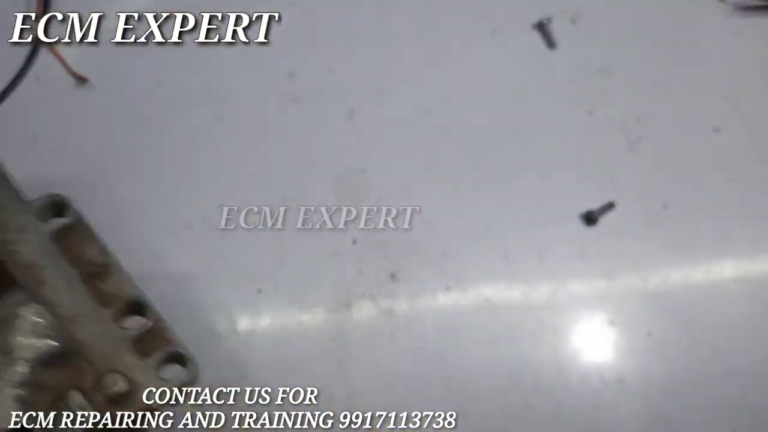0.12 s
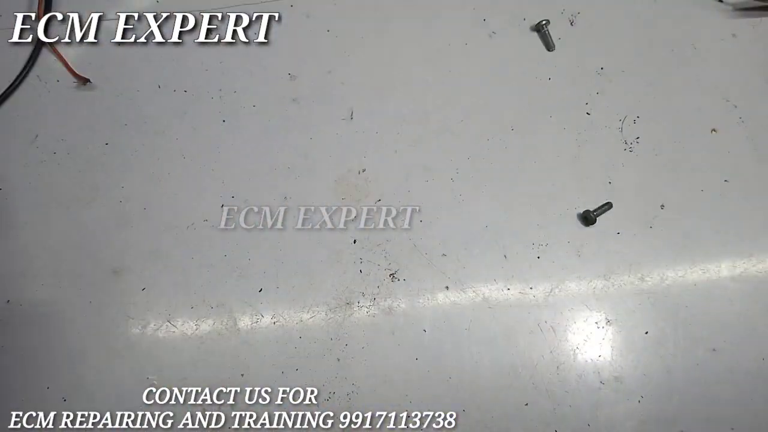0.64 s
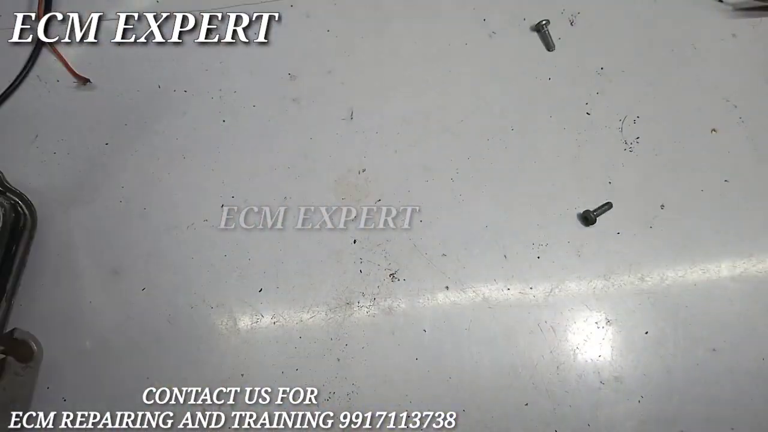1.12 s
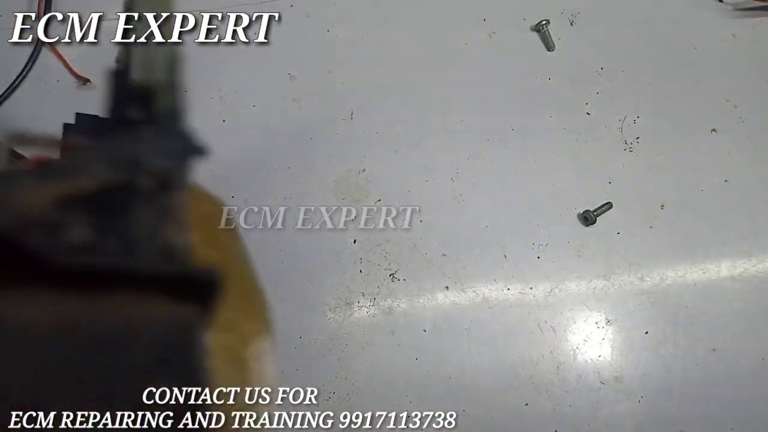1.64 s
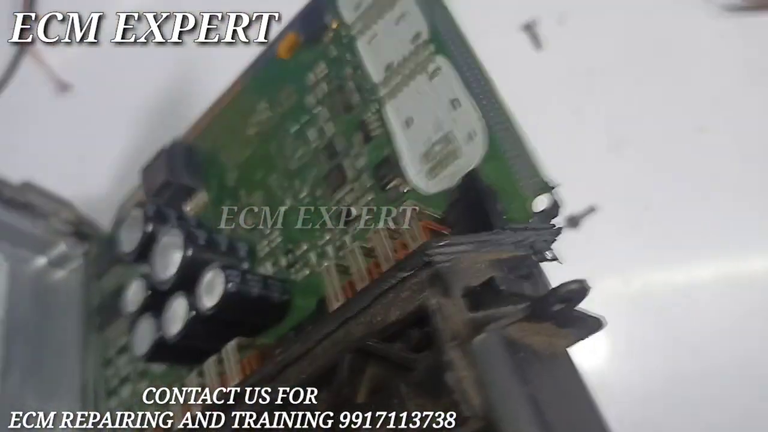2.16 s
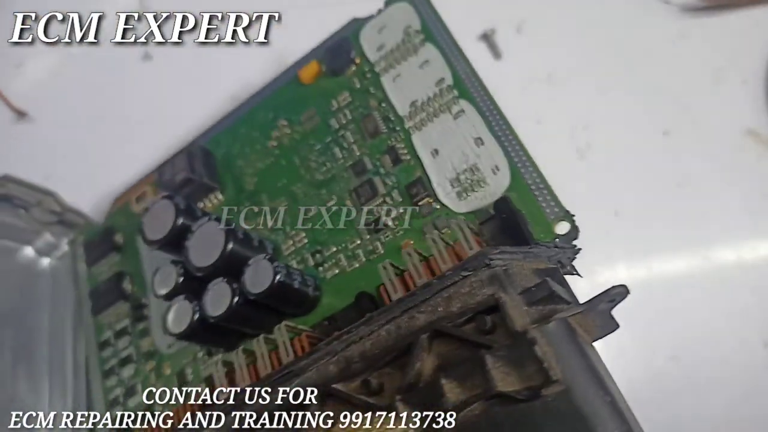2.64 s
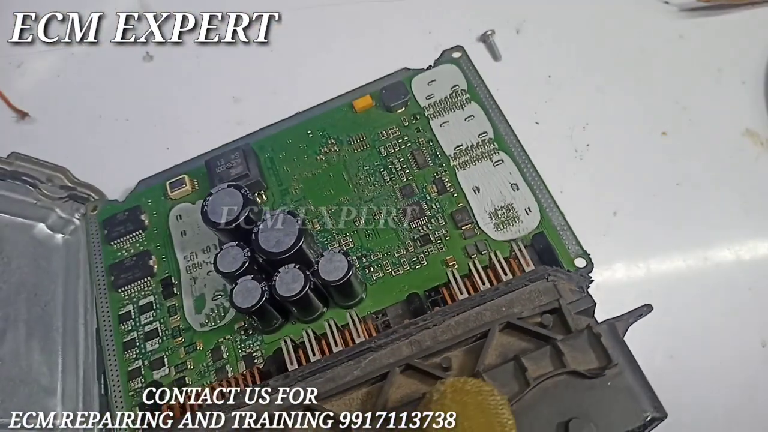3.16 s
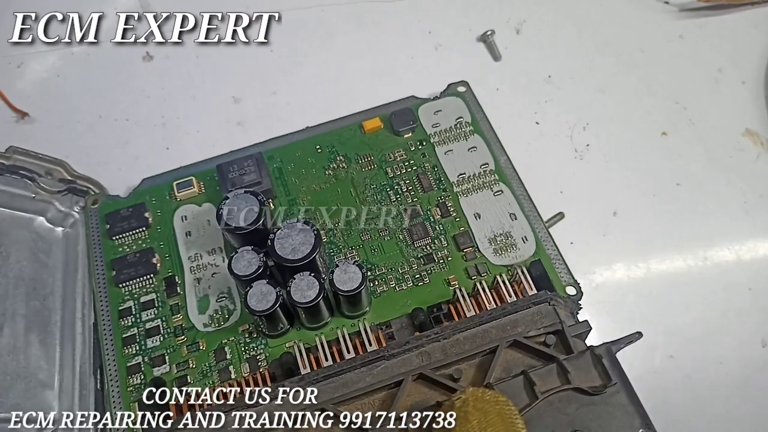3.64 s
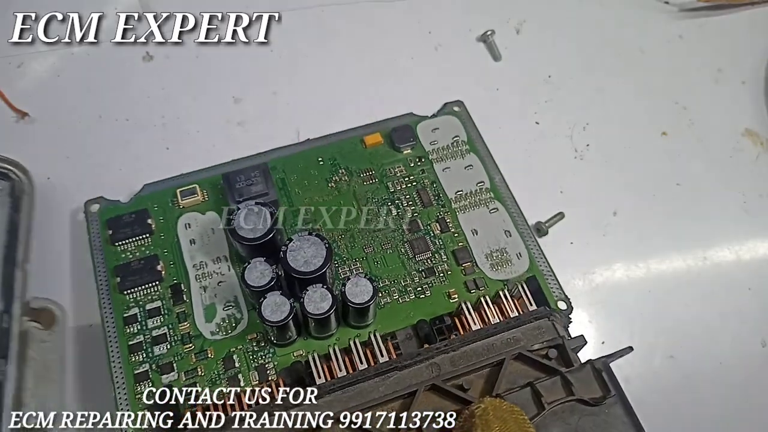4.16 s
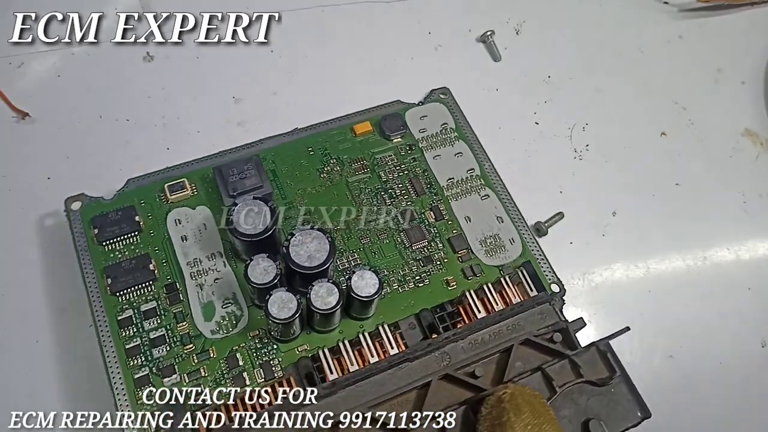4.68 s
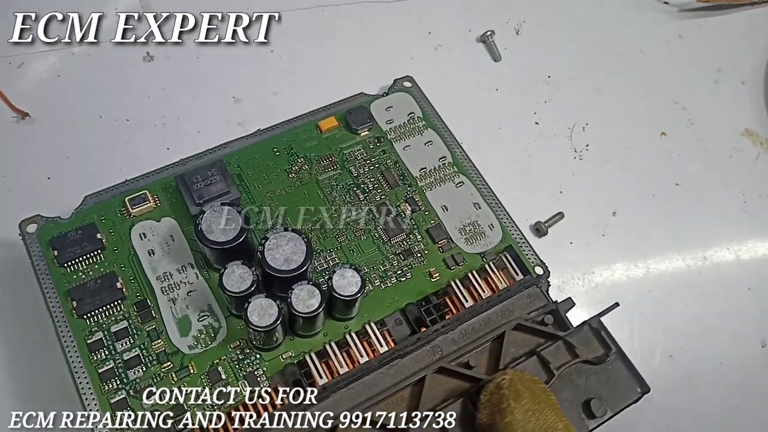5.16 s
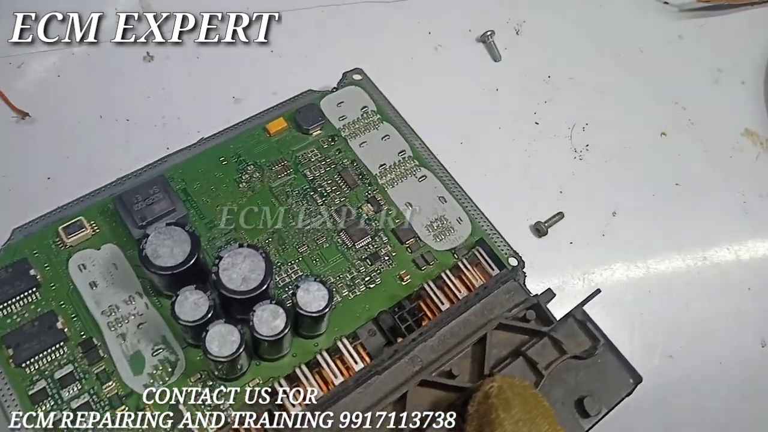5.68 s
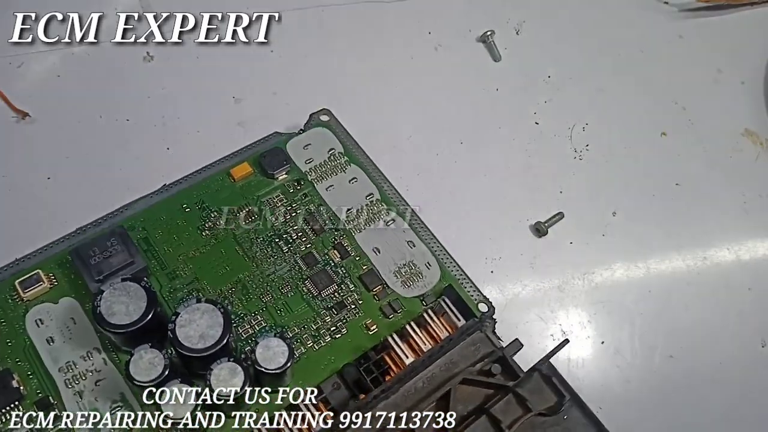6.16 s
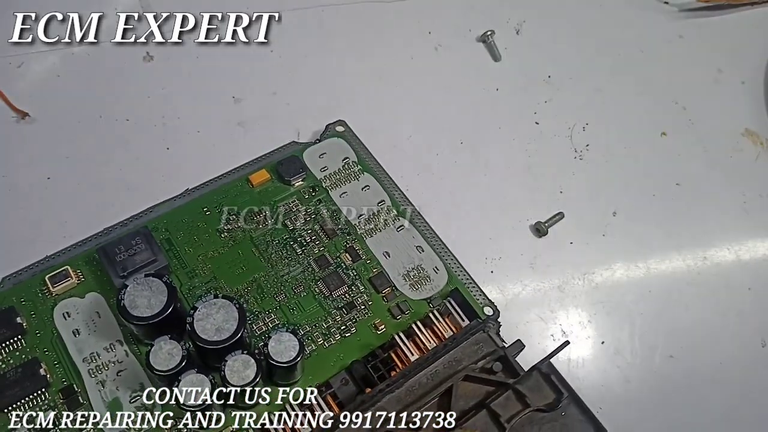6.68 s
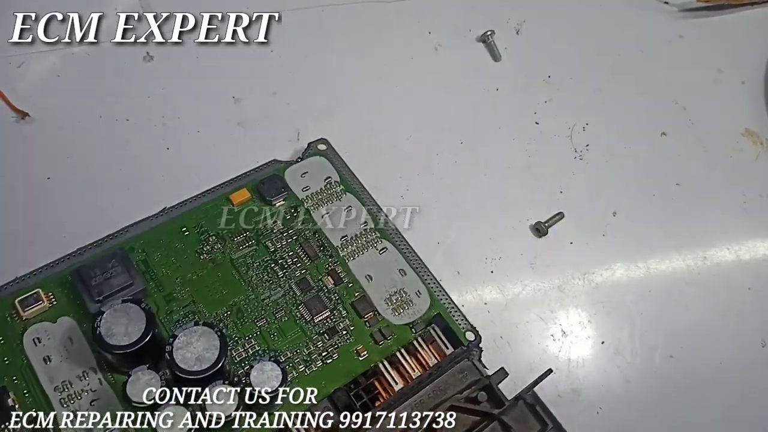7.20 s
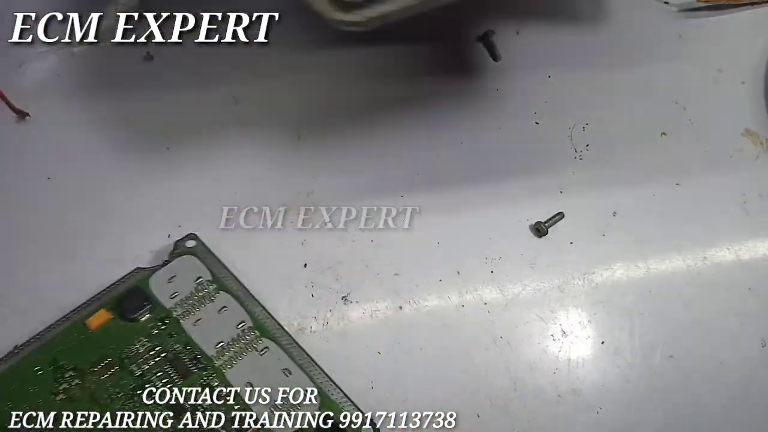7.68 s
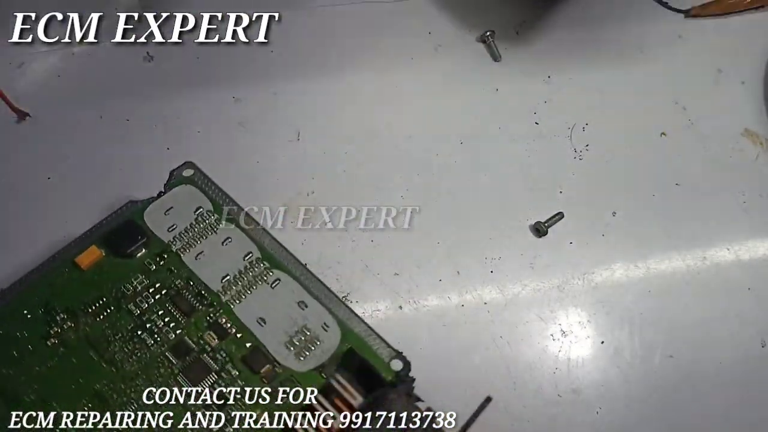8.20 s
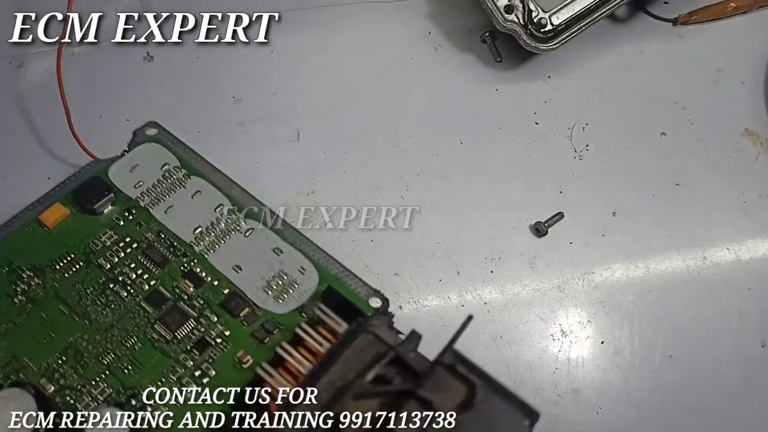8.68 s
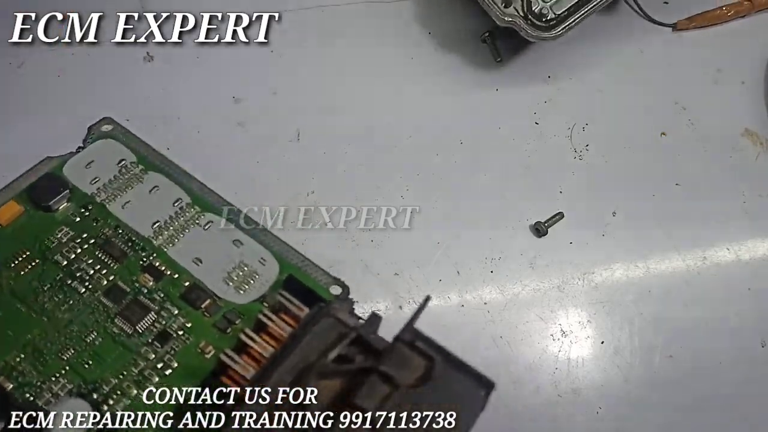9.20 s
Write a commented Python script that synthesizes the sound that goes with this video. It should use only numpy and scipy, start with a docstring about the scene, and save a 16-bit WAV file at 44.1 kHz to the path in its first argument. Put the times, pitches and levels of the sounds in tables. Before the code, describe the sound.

In a small workshop, close to a hard bench, a faint low fan hum runs throughout. After quiet touches comes a soft boomy thud, then a cluster of sharp ticks and gritty scuffs. A housing taps and rocks on the bench, once clearly. Later a rough scrape leads to hard metal knocks from a cast cover, the last pair loudest, with booming bench and small rattles dying off in a short room echo.

```python
"""Metal cover on a workbench

Small workshop, microphone near a hard bench: a cast metal cover and an electronic unit are handled on it.
Cover, housing and small parts are struck by short chatters of contacts that crack and ring split modes.
Parts slide as uneven grit, the bench top booms in its low modes, and one drag sets the cover singing.
These share a short diffuse room; behind them a fan hums in wavering sines over shaped room noise."""
import sys
import numpy as np
from scipy import signal
from scipy.fft import rfft, irfft
from scipy.io import wavfile

SR = 44100
rng = np.random.default_rng(int(sys.argv[2]) if len(sys.argv) > 2 else 0)


def wav_out(sig):
    """Save sig, one row per channel (or a flat mono array), as 16-bit PCM at SR to the path in sys.argv[1]."""
    wavfile.write(sys.argv[1], SR, np.round(np.clip(np.atleast_2d(sig).T, -1, 1) * 32767).astype(np.int16))


def nominal_scale(level):
    """Amplitude ratio for a level in decibels (scalar or array-like)."""
    x = np.asarray(level, float) / 20
    return 10 ** x


N = 411453   # samples, about 9.33 s


def rms_one(x):
    """Scaled to rms 1."""
    return x / np.sqrt(np.mean(x ** 2) + 1e-20)


def at_hz(points, hz):
    """Reads a table of (Hz, value) on a log-frequency axis."""
    table_hz, values = np.transpose(points)
    return np.interp(np.log(hz), np.log(table_hz), values)


def cut(x, hz, kind, order=2):
    """Butterworth low-, high- or band-pass."""
    return signal.sosfilt(signal.butter(order, hz, kind, fs=SR, output="sos"), x + 1e-18)


def drift(rate):
    """Slow chance: normal draws of spread 1, `rate` per second, joined by straight lines."""
    knots = rng.standard_normal(N // 200)
    return np.interp(np.arange(N) * rate / SR, np.arange(len(knots)), knots)


def coloured(x, points):
    """Noise shaped by a spectrum table; rms 1."""
    hz = np.maximum(np.fft.rfftfreq(N, 1 / SR), 1)
    return rms_one(irfft(rfft(x) * nominal_scale(at_hz(points, hz)), N))


def ring(drive, hz, t60):
    """A two-pole resonator: a unit click rings a sine of height 1 that falls 60 dB in t60 seconds."""
    radius = nominal_scale(-60 / (max(t60, .01) * SR))
    angle = 2 * np.pi * hz / SR
    return signal.lfilter([0, np.sin(angle)], [1, -2 * radius * np.cos(angle), radius * radius], drive + 1e-18)


def split_modes(modes, split):
    """An uneven casting splits each mode into four close neighbours that beat."""
    modes = np.repeat(modes, 4, axis=0)
    offsets = np.resize([-1.5, -.5, .5, 1.5], len(modes)) + rng.uniform(-.4, .4, len(modes))
    modes[:, 0] *= 1 + split * offsets
    return modes


def chatter_of(shape):
    """Sharp contacts under an envelope: scattered in time, flat in spectrum."""
    contacts = rng.standard_normal(len(shape))
    for _ in range(4):
        spread = rfft(contacts * shape)
        contacts = irfft(spread / np.abs(spread))   # flatten the spectrum
        early_spread = np.std(contacts[:len(shape) // 64])
        contacts = np.tanh(contacts / (shape + .05) / early_spread)   # even out the heights
    return contacts * shape


def blows(events, modes, ring_db, crack_db, rise, mids_db, mids_follow, contact_ms):
    """Each blow is a short chatter of contacts: heard as a crack in four bands, and feeding the modes."""
    age = np.arange(4096) / SR
    edges, centres = [450, 1050, 2000, 6500, 16000], [750, 1500, 3500, 11000]   # crack bands, Hz
    length = contact_ms / 1000
    envelope = np.tanh(age / (rise * length)) * np.exp(-(age / length) ** 1.2)
    crack = np.zeros((4, N + len(age)))
    drive = np.zeros((len(modes), N + len(age)))
    for s, level_db, body_db, edge_db, *free_db in events:
        chatter = chatter_of(envelope)
        colour = level_db + np.array([body_db, mids_db + mids_follow * body_db, 0, edge_db])
        here = slice(round(s * SR), round(s * SR) + len(age))
        crack[:, here] += nominal_scale(colour[:, None] + np.c_[crack_db]) * chatter

        strength = np.interp(np.log(modes[:, 0]), np.log(centres), colour)
        strength += modes[:, 1] + ring_db + sum(free_db)
        # each blow lands on another spot, so every group of neighbours gets its own chance level
        strength += 2.5 * np.repeat(rng.standard_normal(len(modes) // 4), 4)
        drive[:, here] += nominal_scale(strength)[:, None] * chatter / np.linalg.norm(chatter)

    rings = sum(ring(d[:N], hz, t60) for d, (hz, db, t60) in zip(drive, modes))
    bands = zip(edges, edges[1:])
    cracks = sum(cut(c[:N], band, "band", order=3) for c, band in zip(crack, bands))
    return cut(rings + cracks, 440, "high")


# Colour of the room noise. Each row: frequency in Hz, relative density in dB per Hz.
AIR_COLOUR = [(15, -69), (25, -29), (55, -4), (104, -1.5), (152, -10), (260, -11), (482, -16.5),
              (1050, -27.5), (2200, -33), (2700, -28.5), (7000, -34.5), (8300, -40.5), (9300, -39.5),
              (11000, -47.5), (13800, -42.5), (15500, -42)]
# Room noise over time. Each row: time in seconds, level in dB rms between 250 and 900 Hz, before the sway.
AIR_LEVEL = [(0.0, -52.5), (0.54, -57), (1.27, -58), (2.96, -53.5), (3.19, -55.5), (8.03, -56), (8.68, -51),
             (9.33, -53.5)]
# Hum lines of the fan. Each row: mean frequency in Hz, level in dB rms before the waver.
HUM_LINES = [(70.0, -62.5), (91.5, -65.5), (183.0, -53.5), (242.2, -66), (301.5, -70)]


def fan_and_air():
    """Steady room noise with a slow sway, and hum lines wavering in level and pitch."""
    air = coloured(rng.standard_normal(N), AIR_COLOUR)
    air = air / np.std(cut(air, [250, 900], "band"))
    level_db = np.interp(np.arange(N) / SR, *np.transpose(AIR_LEVEL)) + .5 * drift(6.1)
    hum = np.zeros(N)
    for hz, db in HUM_LINES:
        level = nominal_scale(db + 1.5 * drift(3.7)) * np.sqrt(2)
        wavering_hz = hz + 1.16 * drift(5.0)
        hum += level * np.sin(np.cumsum(2 * np.pi * wavering_hz / SR))
    return nominal_scale(level_db) * air + hum


# How long the workshop rings. Each row: frequency in Hz, time to fall 60 dB in seconds.
ROOM_T60 = [(200, 0.37), (1500, 0.45), (6000, 0.38), (14000, 0.34)]


def room(x, first_s):
    """A diffuse tail: octave bands of noise, each dying at its own rate, fading in over first_s."""
    t = np.arange(SR // 2) / SR
    tail = np.zeros(len(t))
    for low in 125 * 2. ** np.arange(7):
        band = cut(rng.standard_normal(len(t)), [low, 2 * low], "band")
        tail += band * nominal_scale(-60 * t / at_hz(ROOM_T60, low * np.sqrt(2)))
    tail *= np.clip(t / first_s, 0, 1)
    return signal.fftconvolve(x, tail / np.linalg.norm(tail))[:N]


# Weight landing on the bench top. Each row: start in seconds, relative level in dB,
# hardness in dB per octave, nearness to the edge in dB (favours the lowest mode).
THUMPS = [(0.167, -64.5, 23, 0), (0.606, -63, 19, 0), (1.716, -26, -13, -10), (2.274, -35.5, 0, 3),
          (2.301, -42, 8, -6), (2.526, -51, 9, -6), (2.76, -54.5, 8.5, -4), (2.86, -55, 8, -4),
          (2.941, -46.5, 7, -6), (4.113, -43.5, 6.5, -8), (6.253, -45.5, 12.5, -4), (7.026, -51, 16, -4),
          (8.197, -43, 17.5, 3), (8.455, -28, 3.5, 9.5), (8.49, -28.5, 4, 12.5), (8.579, -25.5, -11, -13),
          (8.68, -35, -1.5, -20), (8.829, -34.5, -19, -1), (8.93, -36, -0.5, -11)]
# Modes of the bench top. Each row: frequency in Hz, relative level in dB, t60 in seconds.
BENCH_MODES = [(88, 2.5, 0.3), (118, 2.5, 0.57), (228, -3.5, 0.21), (318.5, -7, 0.12), (433, -3.5, 0.034),
               (507, -3, 0.035)]


def bench():
    """Soft pushes on the bench top; its low modes boom, harder landings reach the higher ones."""
    boom = np.zeros(N)
    at = [round(row[0] * SR) for row in THUMPS]
    _, push_db, hardness, edge_db = np.transpose(THUMPS)
    second_hz = BENCH_MODES[1][0]
    for k, (hz, db, t60) in enumerate(BENCH_MODES):
        octaves = np.log2(min(hz, 380) / second_hz)   # hardness tilts no further than 380 Hz
        pushes = np.zeros(N)
        pushes[at] = nominal_scale(push_db + db + hardness * octaves + edge_db * (k == 0))
        boom += ring(pushes, hz, t60)
    return cut(cut(boom, 710, "low"), 110, "high", order=4)


# One surface sliding on another. Each row: start in seconds, length in seconds,
# relative level in dB, level of the bright part against the dull part in dB.
SLIDES = [(0.036, 0.026, -60, -1.5), (0.14, 0.28, -66, -.5), (0.557, 0.17, -64, -1), (0.794, 0.033, -68, 6),
          (2.183, 0.12, -65.5, 1), (2.274, 0.059, -51, -7), (2.41, 0.0086, -79, 2), (2.72, 0.21, -89, -20),
          (4.105, 0.074, -61.5, -7), (4.223, 0.014, -70.5, 12), (5.362, 0.015, -56, 6.5),
          (5.52, 0.029, -60.5, 2.5), (5.922, 0.023, -63, 2.5), (6.186, 0.036, -44, -8),
          (6.356, 0.059, -59, -2), (6.515, 0.087, -54.5, -7), (6.78, 0.15, -59, -7),
          (8.11, 0.054, -59.5, -9), (8.497, 0.13, -53.5, -6), (8.86, 0.042, -43.5, -9),
          (8.993, 0.023, -74, 12)]
# Colour of the dull part. Each row: frequency in Hz, relative density in dB per Hz.
SLIDE_COLOUR = [(290, -33), (500, -39), (792, -4), (938, -7), (2690, -14.5), (4100, -7), (9000, -15.5),
                (11700, -86), (19800, -120)]


def sliding():
    """Dense grit under the moving surface: uneven grains, dull part and bright part."""
    swell, fade = 510, 300   # dB per second: a stroke comes up fast and dies away slower
    grain_db = 3.5 * np.minimum(rng.exponential(1, N), 5)
    grit = rng.standard_normal((2, N)) * nominal_scale(grain_db)
    t, level, bright = np.arange(N) / SR, np.zeros(N), np.zeros(N)
    for s, length, db, highs_db in SLIDES:
        before, after = np.maximum(s - t, 0), np.maximum(t - s - length, 0)
        stroke = nominal_scale(db - swell * before - fade * after)
        level += stroke
        bright += nominal_scale(highs_db) * stroke
    slips = nominal_scale(5.2 * drift(120))
    dull_grit = coloured(grit[0], SLIDE_COLOUR)
    bright_grit = rms_one(cut(grit[1], 7700, "high"))
    return slips * (level * dull_grit + bright * bright_grit)


# How long each kind of contact chatters: decay time in ms, by kind.
CONTACT_MS = {"knock": 6.1, "tap": 7.68, "tick": 1.47, "scuff": 11}
# In the four blow tables below, body is the lows and edge the highs, both against the upper mids.
# Short scuffs of an edge along the bench. Each row: start in seconds, relative level, body and edge in dB.
SCUFFS = [(2.289, -31, -18, -12), (2.582, -31.5, -42, -10), (4.163, -32.5, -10, -21),
          (6.174, -26.5, -52, -21), (6.207, -19.5, -20, -15.5), (6.354, -29, -20, -13.5)]


def scuffs(unit_modes):
    """Slow-rising, long chatters: nearly all crack, with the unit's modes only faintly stirred."""
    return blows(SCUFFS, unit_modes, ring_db=-51, crack_db=[21.0, 30.4, 1.2, 9.7], rise=0.95,
                 mids_db=-28, mids_follow=0.23, contact_ms=CONTACT_MS["scuff"])


# Small parts and fingers on the unit. Each row: start in seconds, relative level, body and edge in dB.
TICKS = [(1.701, -42.5, -18, -4), (2.264, -20, -24, -9), (2.275, -30, -25, -3), (2.334, -38, -5, -15),
         (2.399, -37, 0, 4), (2.426, -23, -34, -15), (2.433, -31, -2, 7), (2.439, -27, -29, -17),
         (2.53, -35.5, 3, -26), (2.561, -36, -21, -9), (2.664, -74, -16, -3), (2.719, -44, -20, -11),
         (2.786, -44.5, 5, -33), (2.886, -52.5, -12, 9), (6.145, -42, -24, -10), (6.49, -45, -20, -2),
         (6.53, -35, -32, -4), (6.631, -35, -15, -19), (7.859, -40.5, -9, -7)]


def ticks(unit_modes):
    """Very short chatters on the unit, its small parts ringing high up."""
    return blows(TICKS, unit_modes, ring_db=-29.0, crack_db=[12.3, 13.4, 6.7, 7.7], rise=0.13,
                 mids_db=-4.5, mids_follow=0.32, contact_ms=CONTACT_MS["tick"])


# Housing set down and rocked on the bench. Each row: start in seconds, relative level, body, edge
# and ring in dB (how freely it rings after).
TAPS = [(0.166, -33.5, -8, -27, -6), (0.591, -40.5, -23, -36, -4), (0.791, -28.5, -12.5, -19, -5.5),
        (4.116, -40.5, 1.5, -51, -1.5), (4.216, -30.5, -15.5, -38, -2.5), (4.228, -34, -37, -22, 1),
        (4.797, -17, -10.5, -13, 0.5), (4.951, -32, 1, -10, -3), (4.958, -23, -2.5, -15, 2.5),
        (5.146, -28, -12.5, -30, 7), (5.204, -41.5, 2.5, -13, -2.5), (5.347, -48, 0, -38, 13.5),
        (5.359, -34, 11, -40, -4), (5.375, -28.5, -6, -33, -10), (5.94, -36.5, -5.5, -34, -1)]
# Modes of the housing. Each row: frequency in Hz before splitting, relative level in dB, t60 in seconds.
HOUSING_MODES = [(420, -10.5, 0.085), (785, -8, 0.12), (900, -4, 0.061), (970, -27, 0.069),
                 (1163, -3, 0.15), (1325, -9, 0.16), (1643, -8.5, 0.15), (1967, -16.5, 0.32),
                 (2400, -9, 0.1), (3015, -9, 0.09), (3390, -18.5, 0.12), (3900, -7, 0.086),
                 (4350, -19, 0.07), (5070, -6, 0.06), (5460, -29, .05), (6230, -38, .04)]


def housing():
    """Taps of the housing on the bench, each ringing its widely split modes."""
    return blows(TAPS, split_modes(HOUSING_MODES, split=0.02336), ring_db=-6.5,
                 crack_db=[4.5, 17.8, 1.05, 3.1], rise=0.13,
                 mids_db=-5.5, mids_follow=0.47, contact_ms=CONTACT_MS["tap"])


# Modes of the cast cover. Each row: frequency in Hz before splitting, relative level in dB, t60 in seconds.
COVER_MODES = [(411.4, -3.5, .12), (715, -16, 0.16), (780, 1, 0.052), (1310, -3, 0.059), (1545, -0.5, 0.32),
               (1670, -6, 0.24), (1783, -0.5, 0.042), (1960, -15, 0.14), (2300, -11, 0.2),
               (2530, -9.5, 0.045), (2917, -21.5, 0.24), (3145, -8, 0.046), (3800, -12.5, 0.077),
               (4030, -12.5, 0.04), (4730, -10.5, 0.033), (5300, -47, 0.035), (4980, -7.5, 0.097),
               (6900, -5, 0.027), (6150, -4, 0.024), (6930, -11, 0.027), (7700, -4, 0.072),
               (8300, -14, 0.0786)]


def drag():
    """The rim drags on the bench before landing: friction noise sings the modes, the long-ringing most."""
    start_s, length_s, level_db = 8.092, 0.08, -50.5
    t = np.arange(N) / SR - start_s
    friction = rng.standard_normal(N) * (t > 0) * (t < length_s)
    singing = sum(nominal_scale(db) * t60 * ring(friction, hz, t60) for hz, db, t60 in COVER_MODES)
    return nominal_scale(level_db) * singing / np.sqrt(np.sum(singing ** 2) / (length_s * SR))


# Cover on bench. Each row: start in seconds, relative level, body, edge and ring in dB
# (how freely it rings after: up when it hangs in the hand, down when pressed flat).
KNOCKS = [(6.715, -54.5, -12, -27, 4), (6.897, -44, -14, -14, -0.5), (7.016, -11, -30, -18.5, -7),
          (7.025, -13, -22.5, -14.5, 0.5), (7.296, -45.5, -22, -31, 0), (8.092, -44, -19, -16, 1.5),
          (8.193, -8.5, -15.5, -26.5, -15.5), (8.24, -19.5, -17, -25.5, -10), (8.438, -52, -10, -35, 12),
          (8.448, -8, -17, -26, -8.5), (8.553, -27.5, -14, -26, -14), (8.57, -47.5, 10, -37, -7),
          (8.609, -34, -28, -35, -11), (8.67, -42.5, 2, -16, -5.5), (8.708, -37, -29, -46, 2),
          (8.754, -47.5, 3.5, -27, -5), (8.821, -30, -19.5, -13, -3), (8.93, -43.5, -6.5, -43, 5),
          (8.987, -40.5, -23, -48, 2), (9.009, -41.5, -21, -26, 4.5), (9.125, -55.5, -28, -33, 10),
          (9.312, -43.5, -23, -13, -1.5)]


def cover():
    """Knocks of the cover on the bench, each ringing its slightly split modes."""
    return blows(KNOCKS, split_modes(COVER_MODES, split=0.01), ring_db=-3,
                 crack_db=[19.3, 20.6, 2.6, 15], rise=0.11,
                 mids_db=-4, mids_follow=0.66, contact_ms=CONTACT_MS["knock"])


# Modes of the electronic unit. Each row: frequency in Hz before splitting, relative level in dB,
# t60 in seconds.
UNIT_MODES = [(3250, -7, 0.17), (5500, -1, .03), (8640, 6, 0.082), (9200, 2.5, 0.15), (10570, -34, 0.054)]


def scene():
    """Everything near the bench shares the room; fan and air are added behind it."""
    unit_modes = split_modes(UNIT_MODES, split=0.0032)
    struck = cover() + housing() + ticks(unit_modes) + scuffs(unit_modes)
    near = struck + nominal_scale(-2.5) * bench() + sliding() + drag()
    reverberant = nominal_scale(-7) * room(near, first_s=0.00033)
    return (near + reverberant + fan_and_air())[None]


def low_pass(x):
    """Removes everything above the highest recorded frequency."""
    return signal.sosfilt(signal.butter(12, 16800, fs=SR, output="sos"), x)


def record(dry):
    """A small microphone: rolls off below 65 Hz and steeply above 15 kHz."""
    without_rumble = cut(dry, 65, "high")
    mix = cut(without_rumble, 15000, "low", order=12)
    return low_pass(mix)


dry = scene()
out = record(dry)
wav_out(out)
```